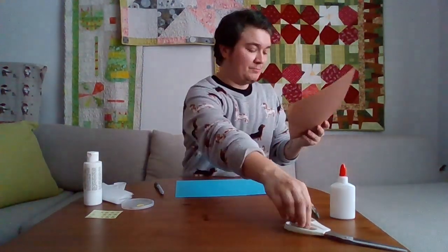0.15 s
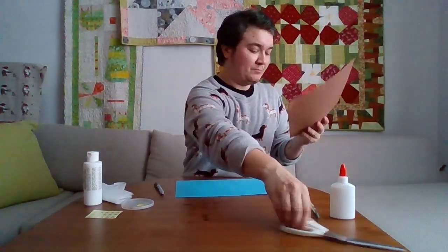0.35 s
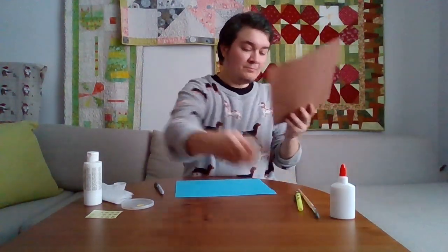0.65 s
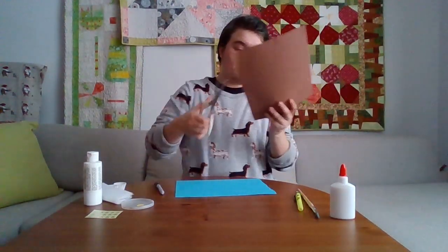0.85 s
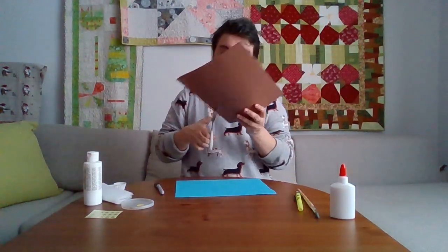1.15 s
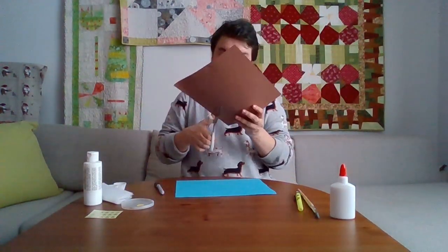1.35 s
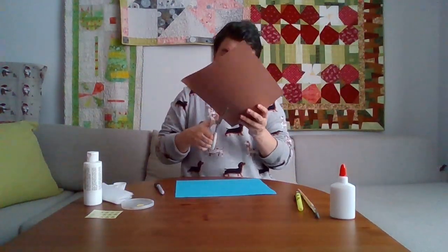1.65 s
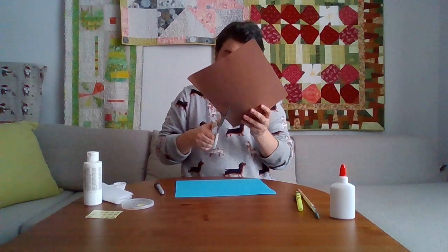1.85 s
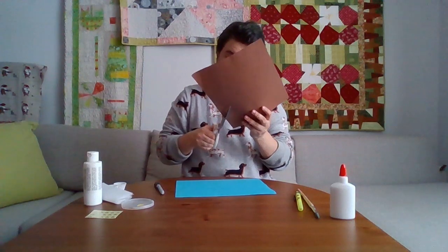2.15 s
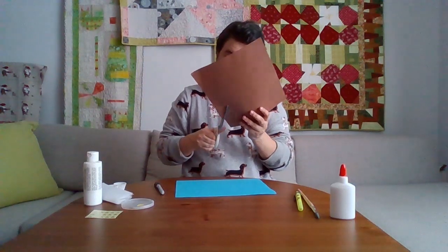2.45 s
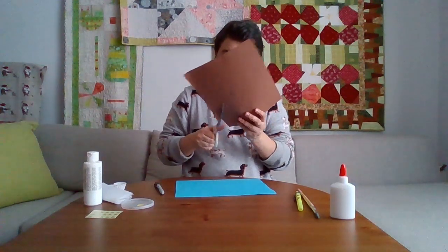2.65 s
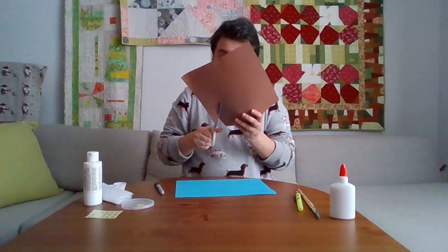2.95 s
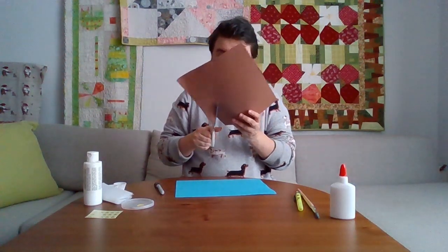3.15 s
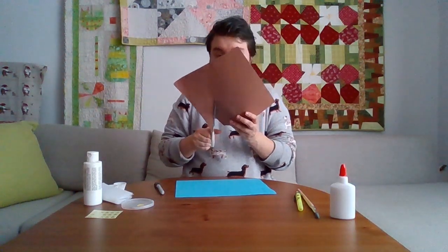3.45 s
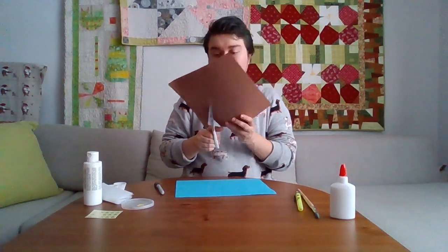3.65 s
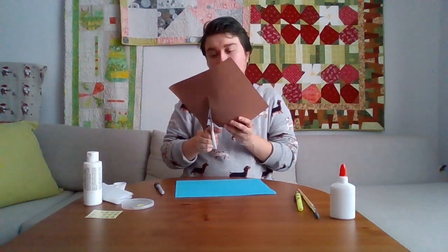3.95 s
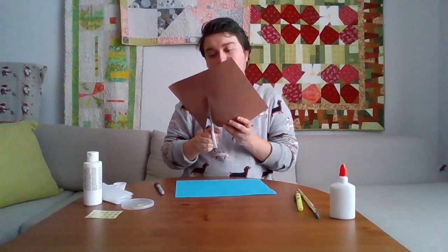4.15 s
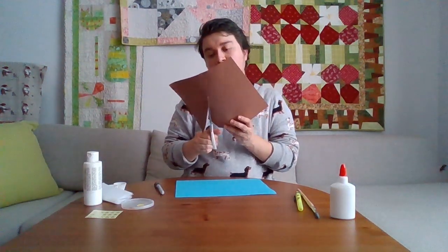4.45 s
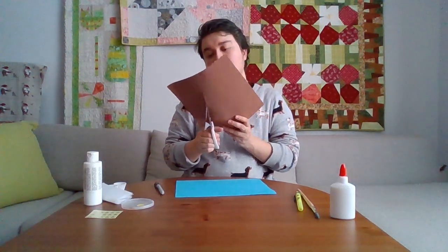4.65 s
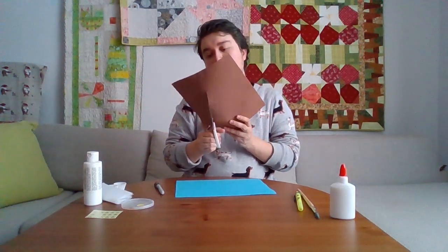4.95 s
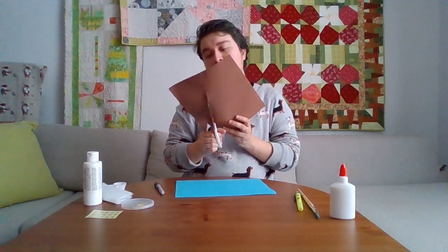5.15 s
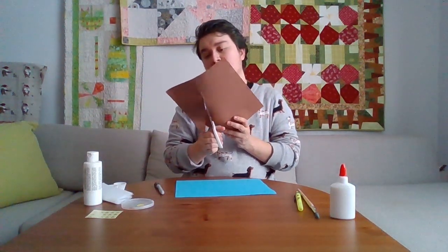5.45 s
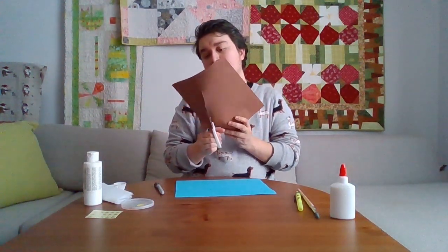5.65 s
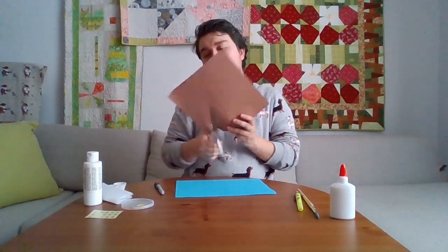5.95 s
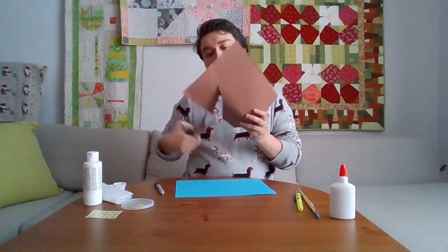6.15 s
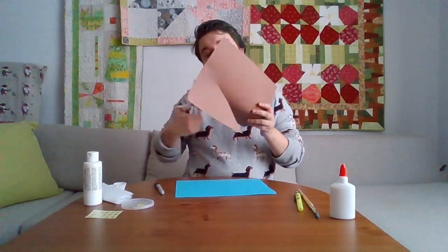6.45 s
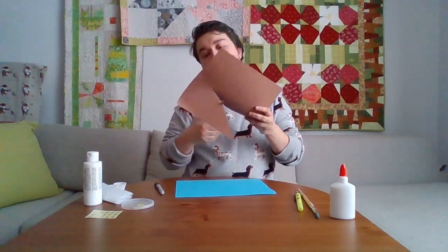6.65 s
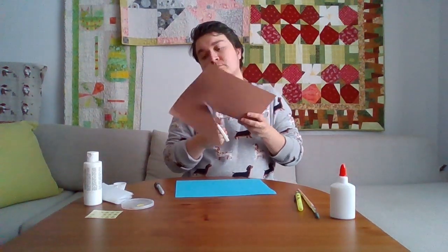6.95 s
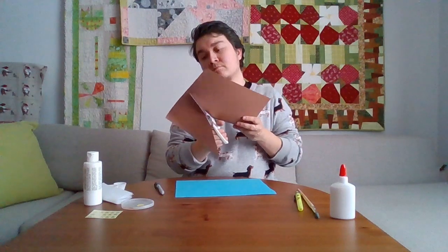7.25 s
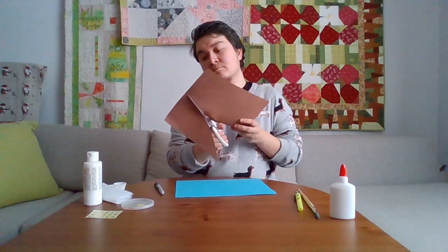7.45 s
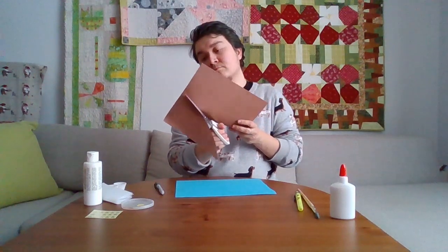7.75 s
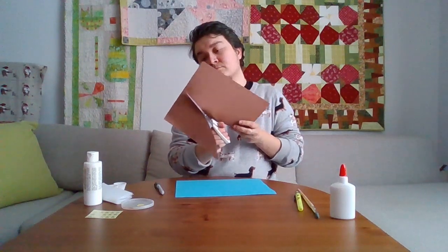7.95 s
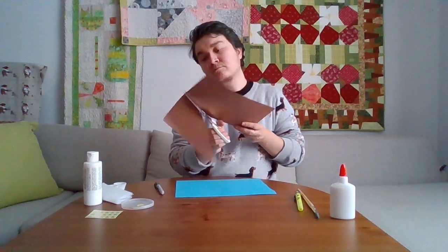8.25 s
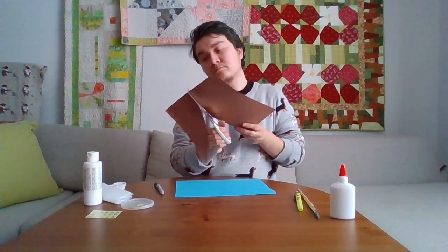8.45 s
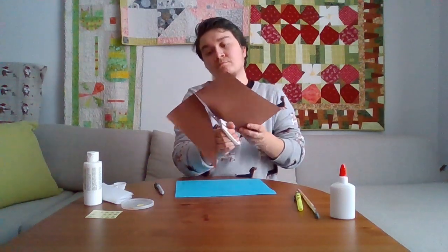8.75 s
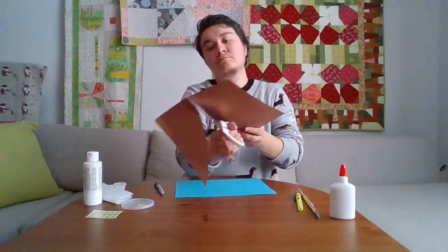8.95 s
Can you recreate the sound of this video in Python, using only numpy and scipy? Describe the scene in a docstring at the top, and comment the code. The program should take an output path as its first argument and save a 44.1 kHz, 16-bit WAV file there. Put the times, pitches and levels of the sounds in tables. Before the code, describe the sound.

After a brief clatter on a table, scissors cut stiff paper in irregular, crackling strokes in a small, quiet room.

```python
"""Scissors cut a stiff sheet of paper in uneven strokes, after knocking and sliding on a wooden table.
Tearing fibres crackle, shake the blades and drum the sheet; the sheet snaps, flexes and rustles.
A small furnished room answers, over a low rumble, hiss and a thin electronic whine."""
import sys
import numpy as np
from scipy import signal
from scipy.fft import rfft, irfft, next_fast_len
from scipy.io import wavfile
from scipy.ndimage import uniform_filter1d, map_coordinates

SR = 44100
rng = np.random.default_rng(int(sys.argv[2]) if len(sys.argv) > 2 else 0)


def put_to_file(sound):
    """Save the sound as 16-bit audio at rate SR, in the file named by the first command-line argument."""
    columns = np.atleast_2d(sound).T  # one column per channel
    safe = np.clip(columns, -1, 1)
    whole_steps = np.round(safe * 32767)
    wavfile.write(sys.argv[1], SR, whole_steps.astype(np.int16))


N = 401751
TIME_S = np.arange(N) / SR


def amp(db):
    """Decibels to gain."""
    return 10 ** (np.asarray(db) / 20)


def unit(x):
    """Scale to rms 1."""
    return x / np.sqrt(np.mean(x ** 2) + 1e-20)


def along(points, hz):
    """Interpolate (freq_hz, value) points on a log axis."""
    freq_hz, values = np.transpose(points)
    return np.interp(np.log(hz + 1), np.log(freq_hz + 1), values)


def wobble(rate_hz):
    """Smooth random curve, rate_hz knots a second."""
    knots = rng.standard_normal(int(N * rate_hz / SR) + 4)
    return map_coordinates(knots, [np.arange(N) * rate_hz / SR])


def filtered(x, response):
    """Apply a complex frequency response."""
    size = next_fast_len(x.shape[-1] + 8192)
    return irfft(rfft(x, size) * response(np.fft.rfftfreq(size, 1 / SR)), size)[..., :x.shape[-1]]


def modes(table):
    """Causal response of (centre_hz, width_hz, gain_db) resonances, alternating in sign."""
    return lambda hz: sum((-1) ** k * amp(db) * 1j * hz * width / (centre ** 2 - hz ** 2 + 1j * hz * width)
                          for k, (centre, width, db) in enumerate(table))


def colour(points):
    """Response of a (freq_hz, gain_db) spectrum."""
    return lambda hz: amp(along(points, hz))


def driven(level, force, response):
    """A body pushed by a force, normalised so that level alone sets its short-term rms."""
    power = uniform_filter1d(filtered(force, response) ** 2, size=SR // 12)
    return filtered(level * force / np.sqrt(np.abs(power) + 1e-12), response)


def ticks(rate_hz, spread_db):
    """Random impulses of uneven size: parting fibres or rough contact."""
    hits = rng.random(N) < rate_hz / SR
    return unit(hits * rng.standard_normal(N) * amp(spread_db * rng.exponential(1, N)))


def background():
    """Room rumble, hiss and faint tones of electronics."""
    # freq_hz, gain_db
    spectrum = [(18, -82), (30, -51.5), (86, -4.5), (158, -1.5), (659, -40), (881, -23.5), (953, -32),
                (3760, -35), (5890, -29), (6900, -49), (8310, -31.5), (9990, -41), (14100, -27.5),
                (16500, -47)]
    # pitch_hz per tone
    whine_hz = [8000, 6089]
    # rms_db per tone
    whine_db = [-76, -87]
    noise = unit(filtered(rng.standard_normal(N), colour(spectrum))) * amp(-67 + 2 * wobble(5))
    whine = sum(np.sqrt(2) * amp(db + 1.2 * wobble(10)) * np.sin(2 * np.pi * hz * TIME_S)
                for hz, db in zip(whine_hz, whine_db))
    return noise + whine


def room(x):
    """Short reverberation; treble dies first."""
    # freq_hz, t60_s
    decay = [(200, 0.2), (600, 0.18), (2000, 0.15), (10000, 0.095)]
    hz, t, spectra = signal.stft(rng.standard_normal(SR // 2), SR, nperseg=256)
    tail = signal.istft(spectra * amp(-60 * t / along(decay, hz)[:, None]), SR, nperseg=256)[1]
    delayed = np.pad(x, (200, 0))
    return signal.fftconvolve(delayed, tail / np.linalg.norm(tail))[:N]


def scrapes():
    """Sliding rubs the scissors into a rough ring and shakes the table top."""
    # one envelope per slide: time_s, ring_db, rumble_db
    slides = [
        [(0.03, -78, -75), (0.06, -55.5, -40.5), (0.128, -43.5, -49.5), (0.13, -37, -40)],
        [(0.3, -38.5, -56), (0.35, -43.5, -41), (0.395, -44.5, -49), (0.44, -82.5, -63)],
    ]
    # sliding scissors: centre_hz, width_hz, gain_db
    scissor_modes = [(690, 500, -5.5), (1147, 110, -3.5), (1669, 160, -0.5), (2720, 55, 6),
                     (3500, 660, -13.5), (4580, 170, 1), (5950, 350, -5), (8750, 990, -10.5)]
    ring_level, rumble_level = sum(amp([np.interp(TIME_S, times_s, db, -120, -120) for db in curves_db])
                                   for times_s, *curves_db in map(np.transpose, slides))
    ring = driven(ring_level, ticks(8000, spread_db=3.5), modes(scissor_modes))
    rumble = driven(rumble_level, rng.standard_normal(N), modes([(109, 20, 0)]))
    return ring + rumble


def knocks():
    """Each contact rings scissors and table at new strengths, under a noisy crack and clatter."""
    # start_s, level_db, crack_rel_db, clatter_rel_db
    contacts = [(0.136, -9.5, -1.5, -10.5), (0.283, -13.5, -4, -20), (0.321, -28, 1.5, -18.5)]
    # scissors and table top: pitch_hz, gain_db, t60_s
    partials = [(428.2, 2, 0.17), (742, 2.5, 0.066), (1086, -3, 0.077), (1142, -15, 0.19), (1590, -4, 0.14),
                (1890, -6, 0.15), (2360, -3.5, 0.059), (2630, -4, 0.22), (3140, -9, .1), (4060, -13, .1),
                (5020, -14, 0.12), (6300, -7, 0.19), (7800, -21.5, .1), (8650, -23.5, .1)]
    # contact noise: freq_hz, gain_db
    spectrum = [(88, -35), (150, -6.5), (682, -9.5), (1160, 2), (1380, -13.5), (1690, 1.5), (1860, -4.5),
                (4420, -6), (9330, -16), (15300, -34.5), (16500, -49.5)]
    out, t = np.zeros(N), np.arange(SR // 3) / SR
    attack = 1 - np.exp(-t / 0.00052)
    for start_s, level_db, crack_db, clatter_db in contacts:
        ring = sum(amp(db + rng.normal(0, 3) - 60 * t / t60_s) * np.sin(2 * np.pi * hz * t)
                   for hz, db, t60_s in partials)
        noise = unit(filtered(rng.standard_normal(len(t)), colour(spectrum)))
        noise *= amp(crack_db - 60 * t / 0.031) + amp(clatter_db - 60 * t / 0.24)
        out[round(start_s * SR):][:len(t)] += amp(level_db) * attack * (amp(-22.5) * ring + noise)
    return out


def flexes(pitch_hz=207, t60_s=0.09, rise_s=0.0051):
    """The whole sheet swings with a soft, damped thud."""
    # start_s, level_db
    thuds = [(4.2, -34), (4.983, -28), (5.655, -37), (6.019, -39.5), (6.87, -36.5), (8.14, -45.5)]
    out, t = np.zeros(N), np.arange(SR // 5) / SR
    swing = amp(-60 * t / t60_s) * (1 - np.exp(-t / rise_s)) * np.sin(2 * np.pi * pitch_hz * t)
    for start_s, level_db in thuds:
        out[round(start_s * SR):][:len(t)] += amp(level_db) * swing
    return out


def sheet(hz):
    """Response of the sheet; paper damps its fast bending."""
    # centre_hz, width_hz, gain_db
    bending = [(195, 39, -16), (375, 87.5, -2.5), (490, 90, 2), (767, 160, -9)]
    return modes(bending)(hz) / (1 + 1j * hz / 1100) ** 2


def flap(drum_level, force):
    """The edge beside the cut rings near 1 kHz once opened, less as it loosens."""
    # time_s, gain_db re drumming
    envelope = [(1.6, -34.5), (1.8, -7), (2.4, 0.5), (3.4, -12.5), (4, -15.5), (9, -11)]
    level = drum_level * amp(np.interp(TIME_S, *np.transpose(envelope)))
    return driven(level, force, lambda hz: modes([(990, 260, 0), (1350, 300, -5)])(hz) ** 2)


def snaps(rise_s=0.0014, t60_s=0.056, push_s=0.0017, push_db=18):
    """Sheet snaps and blade bites: bursts in the four layer levels, and a hollow tap on the sheet."""
    # start_s, crunch_db, then re crunch: drum_db, rasp_db, crackle_db
    events = [(1.235, -55, 14, -18, -14), (2.392, -39, -3, 4, 5), (2.455, -36.5, 0, -21, -11.5),
              (2.658, -56, 12.5, -20, -12), (2.775, -49, 0.5, -8, -7.5), (2.819, -37, 3, -4, -11.5),
              (2.915, -34.5, -14, -10, -9.5), (2.962, -29, -6, -19, -13.5), (3.319, -40.5, 7, -14, -28),
              (3.386, -30.5, -3, -12, -11), (3.63, -56, 6, 6, 7), (3.679, -57, 6.5, -2, -7),
              (3.986, -43, 9.5, 2, 2), (4.034, -43.5, -6, 3, 3), (4.089, -38, -18, -6, -4),
              (4.196, -41, 16.5, -19, 5.5), (4.252, -27.5, -31, -1.5, -2.5), (4.4, -63.5, 9, -7, -6.5),
              (4.825, -63, -10, -5, -2), (4.86, -41.5, -21, 3, 0.5), (4.925, -51.5, 10.5, 3, -1),
              (4.968, -34, -2, 2, -6.5), (4.983, -41, 7, 1, -10.5), (5.034, -35.5, -24, 4, 8),
              (5.14, -52, -3.5, 3, 7), (5.25, -65, 16, 0, -0.5), (5.619, -39.5, -7, 1, 9),
              (5.649, -20.5, -30, -3, -3), (5.926, -56.5, 18.5, 1, -5), (5.975, -33, -25, 16, 3),
              (6.02, -57, 22, 0, -0.5), (6.045, -58.5, 22, 0, 1), (6.162, -31, -11.5, 1.5, -8.5),
              (6.25, -63.5, 21.5, -9, -8), (6.568, -36, -29.5, -6.5, 8), (6.834, -53.5, 21.5, -8, -3),
              (7.035, -61, 22, -8, -5), (7.161, -59.5, 19.5, -11, -11), (8.13, -30.5, -12.5, 0.5, -4.5),
              (8.436, -35, -33, -2, 3.5), (8.511, -42.5, -38, 1, 7.5), (8.538, -60.5, 10, 0, 0.5),
              (8.61, -48, 7, 12, 9.5), (8.64, -45, 2.5, 6, 8), (8.717, -49.5, -1, 4, 6.5),
              (8.807, -40.5, -12.5, -4, 1), (8.851, -51, -13, -11, 6), (8.863, -46.5, -15, -1.5, 5.5),
              (8.885, -43, -19, -14, -3), (8.899, -35, -15.5, 1, 0), (8.965, -46, -27, 5, 8.5),
              (9.027, -43, -36, -3.5, 6.5), (9.095, -53.5, 0.5, -1.5, 8)]
    t = np.arange(SR // 4) / SR
    fade = amp(-60 * t / t60_s) * (1 - np.exp(-t / rise_s))
    push = np.hanning(round(push_s * SR))
    bursts, force = np.zeros((4, N)), np.zeros(N)
    for start_s, crunch_db, drum_db, *bright_db in events:
        i = round(start_s * SR)
        bursts[:, i:i + len(t)] += amp(crunch_db + np.c_[[0, drum_db, *bright_db]]) * fade[:N - i]
        force[i:i + len(push)] = amp(crunch_db + drum_db + push_db) * push
    return bursts, filtered(force, sheet)


def stroke(length_s, swell_db, layers_db, attack_s, release_db_per_s, drum_share=1):
    """Four layer levels of one stroke: attack, linear dB ramp to layers_db, release."""
    t = np.arange(round(length_s * SR) + SR // 5) / SR
    ramp_db = np.c_[[1, drum_share, 1, 1]] * swell_db * (np.minimum(t / length_s, 1) - 1)
    release_db = release_db_per_s * np.maximum(t - length_s, 0)
    return amp(np.c_[layers_db] + ramp_db - release_db) * np.minimum(t / attack_s, 1)


def strokes(gripped_db=3):
    """Crunch, drum, rasp and crackle levels; the held sheet rustles more from the first cut on."""
    # steady rustle: crunch_db, drum_db, rasp_db, crackle_db
    held_db = [-86, -80.5, -83.5, -77]
    # blades closing: start_s, length_s, bite_db, end_db (crunch), re crunch: drum_db, rasp_db, crackle_db
    cuts = [(1.785, 0.67, -72, -53, -26.5, 3, 2.5), (2.313, 0.13, -43, -32, -16, -3.5, -8.5),
            (2.808, .11, -37.5, -33, -1.5, -11, -12.5), (2.954, 0.029, -46.5, -42, -4.5, -13.5, -14.5),
            (3.297, .125, -41.5, -39.5, 5, -11.5, -10), (3.83, 0.073, -60.5, -63.5, 8.5, 0.5, 1.5),
            (3.949, 0.25, -49.5, -55.5, 11.5, -3.5, -1.5), (4.184, 0.07, -46.5, -38.5, -1.5, -6, -6.5),
            (4.863, 0.15, -61.5, -30, -4.5, -4, -2.5), (5.614, 0.059, -44, -31, -3, -2, -1),
            (5.966, .035, -29.5, -36, -3, 8.5, 3), (6.55, 0.034, -37, -34.5, -16.5, 7, 7),
            (6.838, 0.069, -46, -34.5, 2, -6, -4.5), (6.911, 0.055, -35.5, -47, 3, -6.5, -8),
            (7.91, 0.044, -57, -58.5, -3.5, -1.5, 5), (8.125, 0.11, -53.5, -57.5, 0, 3, 5.5),
            (8.405, 0.069, -43, -48.5, -8.5, 2, 2), (8.497, 0.15, -48.5, -48, -7, 2, 4),
            (8.723, .07, -59, -60.5, -1, -3, 4.5), (8.809, .13, -56, -56.5, -8, -0.5, 0.5),
            (8.971, 0.011, -61, -56, -14, -5, 4.5), (9.031, 0.071, -52, -57.5, -8.5, -6, 2.5)]
    # blades opening or sliding: start_s, length_s, crunch_db, re crunch: drum_db, rasp_db, crackle_db
    rubs = [(0.704, 0.026, -84.5, -11.5, 4, 31), (1.065, 0.052, -75, -9, 7, 15),
            (1.144, 0.083, -73, -26, 3, -6), (1.51, 0.32, -77, -6, 6, -25),
            (2.503, 0.15, -52.5, -4, -1.5, -2.5), (3.037, 0.1, -62.5, -5.5, -0.5, 3.5),
            (3.185, 0.021, -62, 3, 2, 7.5), (3.487, 0.24, -56.5, -4.5, -0.5, 2.5),
            (4.327, .07, -71, 3, -1.5, 0), (4.415, 0.21, -62.5, -11, 6, 6.5),
            (4.764, 0.064, -61.5, -9, -1.5, -6), (5.105, .2, -55.5, -11, -1.5, -0.5),
            (5.461, 0.069, -65, -2.5, 1.5, -1), (5.549, 0.011, -60.5, -18, 5.5, 9),
            (5.782, 0.096, -57.5, 4.5, 7, 11.5), (6.003, 0.096, -59, 4, 7.5, 2),
            (6.206, 0.042, -60, 18.5, -12, -9), (6.282, 0.063, -69.5, -27.5, -4.5, 2.5),
            (6.634, 0.092, -62.5, -9, -1, 4), (6.964, 0.083, -56.5, 3, 2, 2),
            (7.116, 0.03, -59.5, 4.5, 4.5, 5.5), (7.308, 0.16, -63.5, 0.5, -1, 4.5),
            (7.474, 0.126, -59, 2, 0.5, 6), (7.794, 0.034, -79, 11, 2, 0), (7.957, 0.044, -67, -5, -4, 1),
            (8.097, 0.027, -59, -3, -0.5, 4), (8.237, 0.013, -72, 8, 4.5, 2.5),
            (8.329, 0.036, -77, 5.5, -8, 3.5)]
    gripped = np.arange(N + SR) / SR > cuts[0][0]
    levels = np.c_[amp(held_db)] * amp(gripped_db * gripped)
    for start_s, length_s, bite_db, end_db, *rel_db in cuts:
        shape = stroke(length_s, end_db - bite_db, end_db + np.r_[0, rel_db],
                       attack_s=0.02, release_db_per_s=519, drum_share=0.77)
        levels[:, round(start_s * SR):][:, :shape.shape[1]] += shape
    for start_s, length_s, crunch_db, *rel_db in rubs:
        shape = stroke(length_s, swell_db=5.5, layers_db=crunch_db + np.r_[0, rel_db],
                       attack_s=0.013, release_db_per_s=297.5)
        levels[:, round(start_s * SR):][:, :shape.shape[1]] += shape
    return levels[:, :N]


def slips(rate_hz, decay_s):
    """Stick and slip: sudden random releases that die away."""
    kicks = (rng.random(N) < rate_hz / SR) * rng.exponential(1, N)
    saw = signal.lfilter([1], [1, -np.exp(-1 / (decay_s * SR))], np.minimum(kicks, 2.5))
    return unit(saw - saw.mean())


def catches(start_s=2.01, first_gap_s=0.05, gap_ratio=0.88, width_s=0.0053):
    """The slow first cut catches and lets go: ten bumps, ever closer."""
    times_s = start_s + first_gap_s * (1 - gap_ratio ** np.arange(10)) / (1 - gap_ratio)
    nearest_s = np.min([abs(TIME_S - at_s) for at_s in times_s], axis=0)
    return np.exp(-(nearest_s / width_s) ** 2)


def shifting(x, depth_db):
    """The sheet changes shape: its colour drifts in patches of frequency and time."""
    spectra = signal.stft(x, nperseg=512)[2]
    patches = uniform_filter1d(rng.standard_normal(spectra.shape), size=5, axis=0)
    patches = uniform_filter1d(patches, size=6, axis=1)
    return signal.istft(spectra * amp(depth_db * unit(patches)), nperseg=512)[1][:N]


def cutting():
    """Parting fibres excite blades, sheet, edges and air as the cut advances in jerks."""
    # blade bending: centre_hz, width_hz, gain_db
    blade_modes = [(1687, 510, -6), (2066, 236, 5.5), (2317, 180, 5), (2516, 140, 6), (2807, 300, 1)]
    # rubbing edges: centre_hz, width_hz, gain_db
    edge_modes = [(3130, 220, 0), (4078, 710, 0.5), (4670, 660, 0), (5136, 260, 1), (5720, 480, -9.5)]
    # freq_hz, gain_db
    fibre_spectrum = [(3530, -24), (6000, -9), (6780, -7.5), (8310, 2.5), (9520, -4), (12100, -11.5),
                      (15800, -20), (16300, -35), (16500, -48)]
    levels = strokes()
    effort = np.clip((20 * np.log10(levels[0]) + 75.5) / 25, 0.3, 1)  # hard cuts stick and slip more
    jerk_db = effort * (0.41 * slips(53, decay_s=0.006) + 0.64 * wobble(130)) + 8.9 * catches()
    bursts, taps = snaps()
    crunch_level, drum_level, rasp_level, crackle_level = levels * amp(jerk_db) + bursts
    tear = ticks(5000, spread_db=1.5)
    force = shifting(tear, depth_db=5) + 0.58 * effort * ticks(250, spread_db=2)  # fine + strong fibres
    drum_force = shifting(ticks(2000, spread_db=1), depth_db=3.5)
    crunch = driven(crunch_level, force, modes(blade_modes))
    drum = driven(drum_level, drum_force, sheet)
    rasp = driven(rasp_level, force, modes(edge_modes))
    crackle = driven(crackle_level, force, colour(fibre_spectrum))
    return crunch + drum + rasp + crackle + flap(drum_level, tear) + taps


def scene(highpass_hz=80):
    """Near sources with their deep bass rolled off, room and background; mono."""
    near = cutting() + flexes() + knocks() + scrapes()
    near = filtered(near, lambda hz: (1j * hz / (1j * hz + highpass_hz)) ** 2)
    return (near + amp(-8.5) * room(near) + background())[None]


def record(dry):
    """Brick-wall low-pass."""
    return filtered(dry, lambda hz: hz < 15960)


dry = scene()
out = record(dry)
put_to_file(out)
```